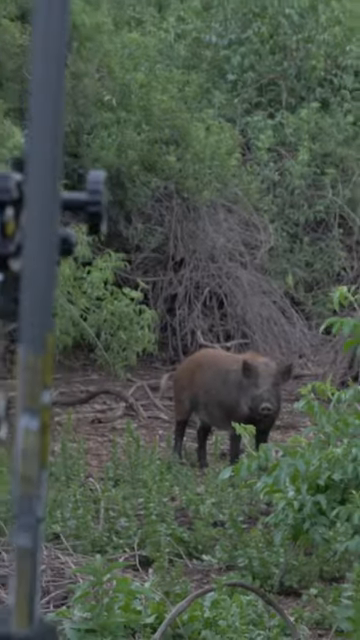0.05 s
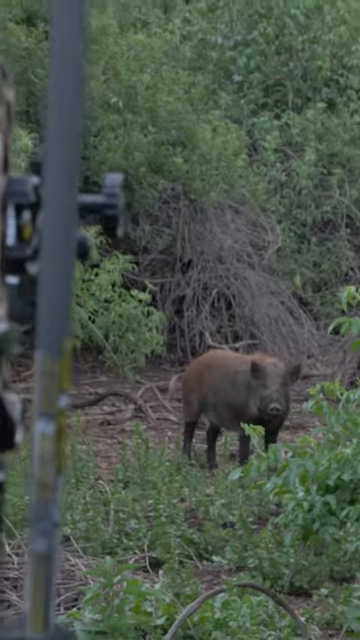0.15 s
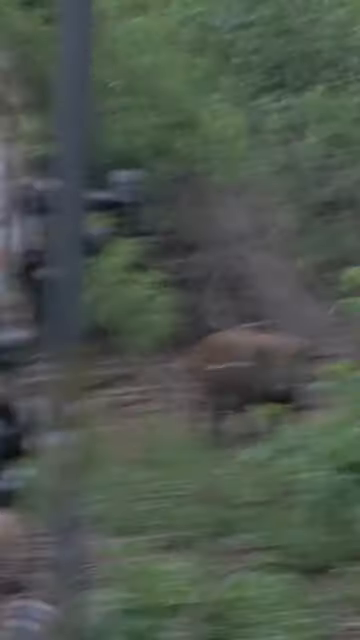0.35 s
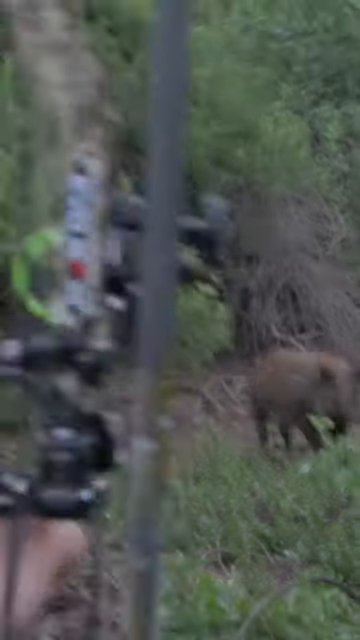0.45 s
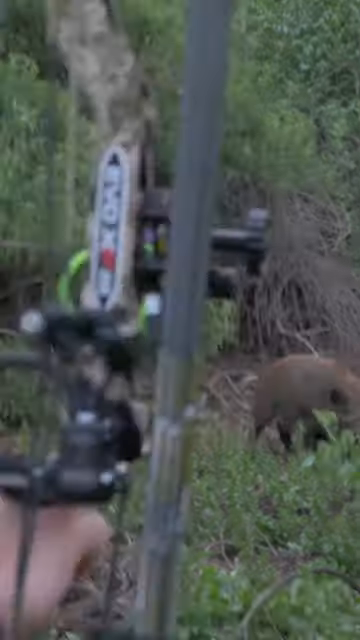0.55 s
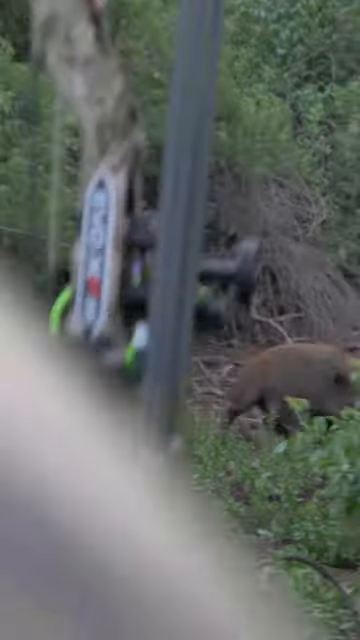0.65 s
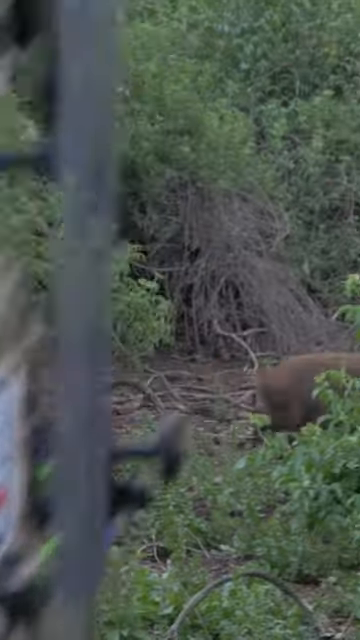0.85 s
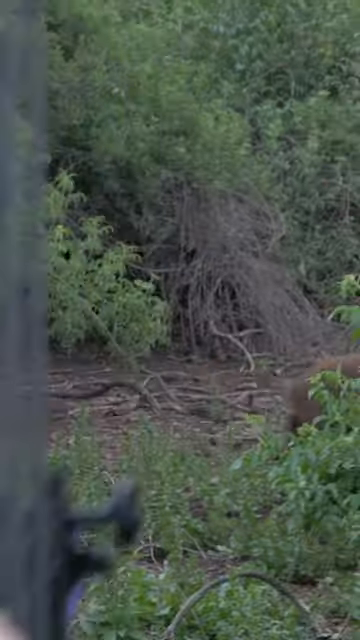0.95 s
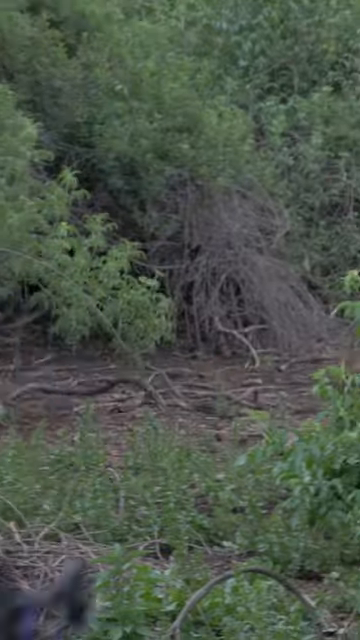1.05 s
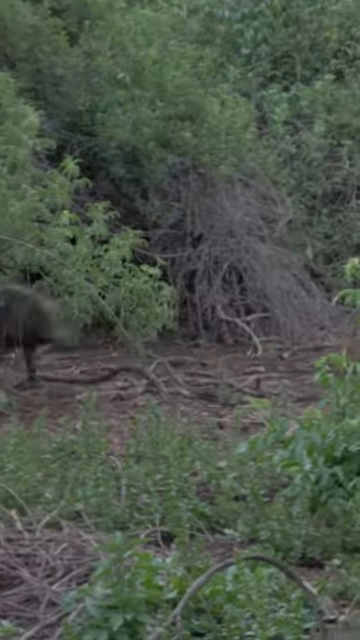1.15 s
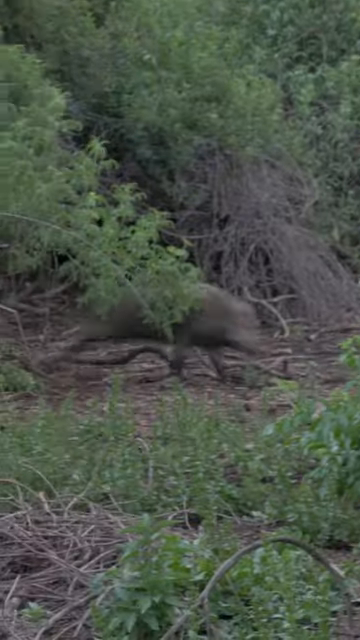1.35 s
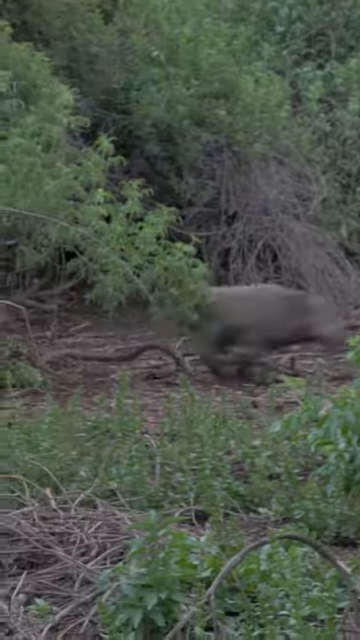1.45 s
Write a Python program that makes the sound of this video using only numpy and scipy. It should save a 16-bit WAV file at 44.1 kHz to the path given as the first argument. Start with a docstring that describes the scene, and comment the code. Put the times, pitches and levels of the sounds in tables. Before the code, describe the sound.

Loud bow shot snaps up close, arrow clatters on impact, and a wild pig crashes through brush

```python
"""A compound bow is shot in scrubland right beside a phone: noise-burst cracks drive decaying limb modes,
while the string whistles, whooshes and slaps its stop. Low damped sines are jolts through the phone's body
and hooves; dense clicks ring the shaft as the arrow strikes. A wild pig crashes off through brush: shaped
noise, leaf grains, and snaps of knock and crackle. Filtered noise gives quiet air and a treble hiss;
blurred gliding tones give faint birds."""
import sys
import numpy as np
from scipy import signal
from scipy.fft import rfft, irfft
from scipy.io import wavfile
from scipy.ndimage import uniform_filter1d

SR = 44100
rng = np.random.default_rng(int(sys.argv[2]) if len(sys.argv) > 2 else 0)


def master(y):
    """Save y as 16-bit WAV."""
    cut = np.clip(np.atleast_2d(y).T, -1, 1)
    pcm = np.round(cut * 32767)  # scale
    wavfile.write(sys.argv[1], SR, pcm.astype(np.int16))


N = 66150
T = np.arange(N) / SR


def undb(db):
    """Decibels to amplitude ratio."""
    return 10 ** (np.asarray(db) / 20)


def unit(x):
    """Scale to rms 1."""
    return x / np.sqrt(np.mean(x ** 2))


def curve(rows):
    """Gain along a (time_s, level_db) table, silent outside."""
    time_s, level_db = np.array(rows).T
    return undb(np.interp(T, time_s, level_db, left=-150, right=-150))


def colour(x, table):
    """Filter by (freq_hz, relative_db) points over log frequency; rms 1."""
    freq_hz, relative_db = np.array(table).T
    bins_hz = np.fft.rfftfreq(N, 1 / SR)
    gain_db = np.interp(np.log(bins_hz + 1), np.log(freq_hz), relative_db)
    return unit(irfft(rfft(x) * undb(gain_db), N))


def noise():
    """White noise over the whole scene."""
    return rng.standard_normal(N)


def decay(t, t60_s):
    """Exponential fall of 60 dB in t60_s."""
    return 1000. ** (-t / t60_s)


def ring(x, hz, t60_s):
    """Two-pole resonance: a mode falling 60 dB in t60_s; a unit impulse peaks near 1."""
    radius = np.exp(-np.log(1000) / (t60_s * SR))
    angle = 2 * np.pi * hz / SR
    return signal.lfilter([0, np.sin(angle)], [1, -2 * radius * np.cos(angle), radius * radius], x)


def add(out, start_s, x):
    """Mix x into out from start_s, cut at the end."""
    i = int(start_s * SR)
    out[i:i + len(x)] += x[:N - i]
    return out


def burst(hz, width_hz, t60_s):
    """A dying puff of band noise with peak 1."""
    rise_s = 0.00014
    t = np.arange(int(SR * t60_s) + 1) / SR
    puff = rng.standard_normal(len(t)) * decay(t, t60_s) * (1 - np.exp(-t / rise_s))
    edges_hz = np.clip([hz - width_hz / 2, hz + width_hz / 2], 100, 19000)
    x = signal.sosfilt(signal.butter(2, edges_hz, "band", fs=SR, output="sos"), puff)
    return x / np.abs(x).max()


def knock(hz, t60_s):
    """A rough contact ringing one short mode, peak 1."""
    contact_share = 0.44  # of the ring time
    push = burst(hz, hz, contact_share * t60_s)
    x = ring(np.pad(push, (0, int(SR * t60_s))), hz, t60_s)
    return x / np.abs(x).max()


def clicks(rate_per_s, spread_db):
    """Random clicks of either sign, a few bigger than the rest."""
    hits = rng.random(N) < rate_per_s / SR
    sizes = undb(spread_db * np.minimum(rng.exponential(size=N), 2.5))
    return hits * np.sign(noise()) * sizes


def walk(rate_hz):
    """Random wander: noise averaged twice over 1 / rate_hz; rms 1."""
    k = int(SR / rate_hz)
    return unit(uniform_filter1d(uniform_filter1d(noise(), k), k))


def note(start_s, length_s, start_hz, end_hz, level_db, blur_hz):
    """A gliding tone blurred into a narrow band by random in-phase and quadrature wander."""
    blur_depth = .45
    n = int(length_s * SR)
    phase = 2 * np.pi * np.cumsum(np.geomspace(start_hz, end_hz, n)) / SR
    in_phase = (1 + blur_depth * walk(blur_hz)[:n]) * np.sin(phase)
    quadrature = blur_depth * walk(blur_hz)[:n] * np.cos(phase)
    tone = signal.windows.tukey(n, .5) * (in_phase + quadrature)
    return add(np.zeros(N), start_s, undb(level_db) * tone)


def air():
    """Outdoor hush: coloured noise whose bass wanders in gusts."""
    # hush spectrum: freq_hz, relative_db
    hush_colour = [(12, 2.5), (20, -4.5), (81, -10), (211, -21.5), (413, -15.5), (1200, -19.5),
                   (1600, -29.5), (2200, -30), (2800, -34.5), (5200, -38), (6500, -48), (16200, -52)]
    hush_db, gust_rms_db, gust_top_hz = -45, 3.5, 148
    hush = colour(noise(), hush_colour)
    low = signal.sosfilt(signal.butter(2, gust_top_hz, fs=SR, output="sos"), hush)
    gust_gain = undb(gust_rms_db * walk(4))
    return undb(hush_db) * (hush + low * (gust_gain - 1))


def birds():
    """Distant calls as blurred gliding tones."""
    # bird notes: start_s, length_s, start_hz, end_hz, level_db, blur_hz
    bird_notes = [(0, .1, 5200, 5100, -64, 500), (0, .08, 4700, 4800, -64, 1000),
                  (0, .035, 3700, 3450, -61, 600), (.055, .105, 3720, 3660, -64, 200),
                  (.155, .08, 3640, 3580, -61, 90), (.135, .065, 2060, 2040, -59, 90),
                  (.128, .025, 5200, 4400, -63, 1400), (.135, .05, 4150, 4000, -63, 500),
                  (.06, .06, 3500, 3150, -65, 700), (.2, .033, 5800, 6300, -65, 700)]
    return sum(note(*row) for row in bird_notes)


def thumps():
    """Bow recoil in the phone's body, then hooves: each a soft push ringing a few low cycles."""
    # low jolts: start_s, level_db, pitch_hz, t60_s, push (1 up, -1 down)
    jolts = [(.187, -31, 109, 0.037, 1), (0.2361, 1, 345, 0.005, 1), (0.237, -20, 61, 0.079, -1),
             (0.2571, 1.5, 306, 0.0089, 1), (0.258, -33, 137, 0.097, -1), (.312, -26.5, 152, 0.24, -1),
             (0.3653, -6, 136.4, 0.053, 1), (0.369, -8, 49.7, 0.095, -1), (0.377, -14.5, 155, 0.087, 1),
             (0.4182, -34, 258, 0.02, 1), (0.4269, -5.5, 248, 0.0142, 1), (.6, -43, 140, .12, 1),
             (0.4304, -22, 170, 0.087, -1), (.428, -27.5, 44, 0.17, -1), (0.491, -24.5, 54.6, 0.08, 1),
             (0.9933, -24.5, 161, 0.048, 1), (1.205, -29, 140, 0.047, 1), (1.2802, -18.5, 146, 0.037, -1),
             (1.224, -35.5, 38.6, 0.42, 1), (1.229, -25.5, 411, 0.074, 1), (1.242, -31.5, 167, 0.21, 1),
             (1.386, -28.5, 143, 0.027, 1), (.69, -38.5, 181, 0.065, 1), (1.471, -28.5, 193, 0.049, 1)]
    rise_cycles = 0.045
    out = np.zeros(N)
    for start_s, level_db, hz, t60_s, push in jolts:
        t = np.arange(int(SR * t60_s)) / SR
        envelope = (1 - np.exp(-t * hz / rise_cycles)) * decay(t, t60_s)
        add(out, start_s, np.sign(push) * undb(level_db) * envelope * np.sin(2 * np.pi * hz * t))
    return out


def bow_cracks():
    """Noise-burst cracks of the bow, with impulses driving the limb modes."""
    # cracks: start_s, peak_db, centre_hz, width_hz, t60_s, limb_drive_db
    cracks = [(.2362, -6.5, 2850, 5000, 0.021, -47), (.2380, -1, 9200, 13100, .012, -24),
              (.2415, -21, 10700, 8000, 0.044, -52), (.2570, 3.5, 7400, 11200, 0.0076, -8),
              (.2590, -35, 13000, 8000, .03, -13), (.2655, -24, 10900, 8000, .02, -29),
              (0.2775, -21, 12900, 7000, .012, -61), (.4172, -21, 5700, 9300, 0.01, -35),
              (.4310, -32.5, 6600, 7440, 0.12, -57)]
    # limb modes: freq_hz, gain_db, t60_s
    limb_modes = [(151, -6.5, 0.049), (279.3, -2.5, 0.2), (633.5, -22.5, 0.24), (775, 0.5, 0.054),
                  (1051, -13, 0.16), (1085, -34, 0.3), (1380, -10, 0.094), (1374, -23, 0.21),
                  (1560, -32, 0.23), (1828, -18, 0.15), (1930, -48, 0.36), (2230, -8, 0.13),
                  (3872, -21, 0.12), (4500, -43, 0.3)]
    out, drive = np.zeros(N), np.zeros(N)
    for start_s, peak_db, hz, width_hz, t60_s, drive_db in cracks:
        add(out, start_s, undb(peak_db) * burst(hz, width_hz, t60_s))
        add(drive, start_s, np.array([undb(drive_db)]))
    for k, (hz, gain_db, t60_s) in enumerate(limb_modes):
        out += (-1) ** k * undb(gain_db) * ring(drive, hz, t60_s)  # alternating polarity
    return out


def bowstring():
    """The string whooshes as noise, whistles upward as it speeds up and slaps its stop once a swing."""
    # whoosh and hiss after the shot: time_s, level_db
    whoosh_level = [(.236, -37), (.240, -24), (.248, -43), (.256, -17.5), (.262, -15), (.285, -28),
                    (.32, -39), (.37, -44), (.4, -78)]
    # whoosh spectrum: freq_hz, relative_db
    whoosh_colour = [(59, -38), (100, -10), (289, -5.5), (415, -1.5), (1030, -6), (2270, -15),
                     (3120, -18.5), (6840, -22), (16000, -33)]
    # rising whistle: start_s, length_s, start_hz, end_hz, level_db, blur_hz
    whistle = (.2445, .012, 1300, 4000, -27, 600)
    # slaps: start_s, peak_db, pitch_hz
    slaps = [(0.2782, -16, 6500), (0.3017, -29, 5820), (0.3229, -22, 6020), (0.347, -33, 6300)]
    slap_t60_s = 0.007
    out = note(*whistle) + curve(whoosh_level) * colour(noise(), whoosh_colour)
    for start_s, peak_db, hz in slaps:
        add(out, start_s, undb(peak_db) * knock(hz, slap_t60_s))
    return out


def leaves():
    """Short ringing grains, each half octave with its own."""
    rate_at_1khz_per_s, spread_db, ring_cycles = 150, 9.5, 3
    out = np.zeros(N)
    for hz in 180 * 2. ** np.arange(0, 6.6, .5):
        grains = clicks(rate_at_1khz_per_s * (hz / 1000) ** .5, spread_db)
        out += unit(ring(grains, hz, ring_cycles / hz)) * np.sqrt(hz)
    return out


def brush():
    """Fluttering rustle and leaf grains follow how hard the pig pushes through."""
    # push through the brush: time_s, level_db
    push_level = [(.416, -28), (.44, -46.5), (.47, -57), (.56, -48), (.59, -45.5), (.62, -47), (.69, -48.5),
                  (.73, -51.5), (.94, -51.5), (.97, -48.5), (1.0, -40), (1.04, -52), (1.11, -46.5),
                  (1.2, -58.5), (1.225, -44), (1.25, -38.5), (1.28, -42), (1.32, -48.5), (1.4, -45),
                  (1.43, -52.5), (1.5, -45)]
    # brush spectrum: freq_hz, relative_db
    brush_colour = [(60, -29), (130, 3.5), (250, -4.5), (400, -3.5), (1000, -12), (2500, -13), (4500, -24),
                    (7000, -27), (14400, -36), (16200, -44)]
    flutter_rms_db, flutter_hz, leaves_db = 2.5, 26, -2.5
    rustle = colour(noise(), brush_colour) * undb(flutter_rms_db * walk(flutter_hz))
    return curve(push_level) * (rustle + undb(leaves_db) * colour(leaves(), brush_colour))


def far_hiss():
    """Steady treble noise that sets in after the shot."""
    # hiss spectrum: freq_hz, relative_db
    hiss_colour = [(1500, -35), (4000, 9.5), (8000, -3), (16200, -12)]
    level_db, start_s = -59, .416
    return undb(level_db) * (T > start_s) * colour(noise(), hiss_colour)


def strike():
    """Dense knocks swell and fade, ringing the arrow's shaft until it lodges and is damped."""
    # rattle swell: time_s, level_db
    swell = [(.479, -59), (.483, -46), (.489, -38.5), (.492, -29.5), (.502, -24), (.514, -21.5),
             (.53, -29.5), (.545, -52), (.56, -44)]
    # hardest knocks: start_s, size_db over the rattle
    hard_knocks = [(.4825, 18), (.4915, 14), (.5035, 22), (.5098, 22.5), (.5140, 19.5)]
    # shaft modes: freq_hz, relative_db, t60_s (before damping)
    shaft_modes = [(572, -9, 0.093), (734, -14, 0.13), (1482, -7, 0.24), (1507, -4, 0.52),
                   (1945, -13, 0.092), (2080, -7, 0.076), (2320, -6, 0.072), (2742, 1.5, 0.039),
                   (3200, -25, 0.033), (3885, -6.5, 0.1), (6100, -12, 0.043)]
    # dry rattle spectrum: freq_hz, relative_db
    rattle_colour = [(180, -57), (400, -35), (700, 6), (1150, -19.5), (1500, -1.5), (2600, -1), (5200, -16),
                     (5800, -33), (6400, -21), (9000, -29), (13000, -41), (16000, -58)]
    rattle_per_s, spread_db, dry_db, smear_t60_s = 2400, 5.5, 2, 0.0017
    lodge_s, damping_time_s, damping_db = .549, .004, -14
    envelope = curve(swell)
    knocks = clicks(rattle_per_s, spread_db)
    knocks = knocks / np.sqrt(uniform_filter1d(knocks ** 2, size=800) + 1e-3)  # even local level
    for start_s, size_db in hard_knocks:
        add(knocks, start_s, np.array([undb(size_db)]))
    knocks = knocks * envelope
    shaft = sum(undb(db) * ring(knocks, hz, t60_s) for hz, db, t60_s in shaft_modes)
    shaft = shaft * undb(damping_db * np.clip((T - lodge_s) / damping_time_s, 0, 1))
    smear = signal.lfilter([1], [1, -decay(1 / SR, smear_t60_s)], np.abs(knocks))
    grit = 0.25 * smear * noise()
    size = np.sqrt(np.mean(envelope ** 2))
    return size * (unit(shaft) + undb(dry_db) * colour(knocks + grit, rattle_colour))


def branches():
    """Each branch broken by the pig is a ringing knock, noise around its pitch and a higher crackle."""
    # snaps: start_s, knock_peak_db, knock_hz, crackle_peak_db, crackle_hz, base_t60_s (scaled per part)
    snaps = [(.583, -34, 1760, -37, 3460, 0.047), (0.589, -26.5, 930, -34.5, 2440, 0.037),
             (.673, -36, 856, -34, 2500, 0.058), (.683, -30.5, 994, -29.5, 4170, 0.061),
             (.969, -36.5, 990, -39, 3530, 0.041), (.980, -36, 780, -34.5, 2400, 0.069),
             (.987, -34.5, 725, -38, 5500, 0.045), (1.009, -54, 734, -39, 7400, 0.031),
             (1.055, -35, 2470, -42.5, 6740, 0.024), (1.09, -40.5, 764, -43, 2480, 0.022),
             (1.189, -40, 2030, -39, 10900, 0.012), (1.222, -23, 886, -22.5, 3280, 0.04),
             (1.2254, -16, 1005, -23.5, 4250, 0.044), (1.238, -29, 990, -36, 2480, 0.038),
             (1.243, -25.5, 950, -37, 3520, 0.059), (1.254, -24.5, 2250, -44, 5970, 0.01),
             (1.262, -24.5, 1010, -38, 3000, 0.097), (1.268, -25.5, 940, -24, 2960, 0.02),
             (1.274, -30, 930, -39, 2520, 0.024), (1.297, -35, 890, -41, 3500, .03),
             (1.310, -38, 900, -39, 6460, 0.01), (1.36, -42, 1080, -38, 4200, 0.016),
             (1.392, -29, 1760, -39, 4020, 0.015), (1.405, -33, 1890, -60, 3000, 0.018),
             (1.437, -58, 1500, -39, 9900, .02), (1.445, -32.5, 1750, -47, 3000, 0.037),
             (1.473, -29.5, 670, -34.5, 1840, .02), (1.48, -51, 1000, -40, 6640, 0.017)]
    rough_width, rough_db = 0.66, -4.5  # share of knock pitch; relative to knock
    crackle_width = 0.65  # share of centre
    out = np.zeros(N)
    for start_s, knock_db, hz, crackle_db, crackle_hz, t60_s in snaps:
        add(out, start_s, undb(knock_db) * knock(hz, .5 * t60_s))
        add(out, start_s, undb(knock_db + rough_db) * burst(hz, rough_width * hz, t60_s))
        crackle = burst(crackle_hz, crackle_width * crackle_hz, 1.17 * t60_s)
        add(out, start_s, undb(crackle_db) * crackle)
    return out


def scene():
    """All layers summed into one channel."""
    shot = thumps() + bow_cracks() + bowstring()
    pig = brush() + branches()
    return (air() + birds() + shot + pig + far_hiss() + strike())[None]


def record(dry):
    """The level dips briefly after the big jolt; tanh rounds peaks and a steep filter cuts the top."""
    # level dip: time_s, gain_db
    dip = [(0.3848, -4.5), (0.39, 1), (0.392, -5), (0.414, -12.5), (0.416, 8)]
    drive, top_hz = 0.95, 16100
    time_s, gain_db = np.array(dip).T
    gain = undb(np.interp(T, time_s, gain_db, left=0, right=0))
    rounded = np.tanh(drive * dry * gain) / drive
    return signal.sosfilt(signal.ellip(10, .2, 70, top_hz, fs=SR, output="sos"), rounded)


dry = scene()
out = record(dry)
master(out)
```